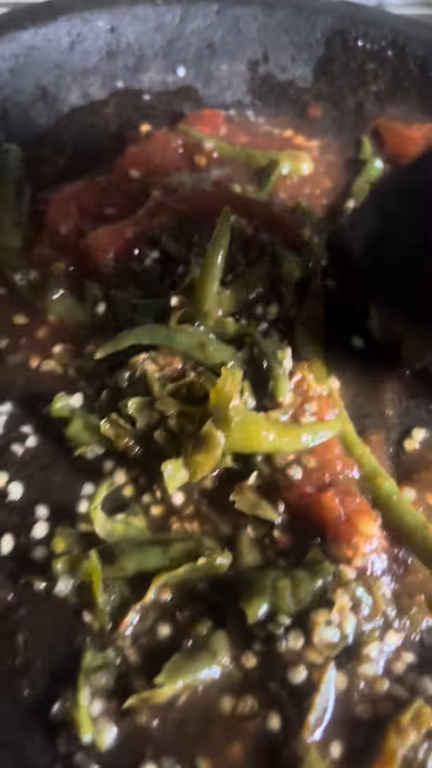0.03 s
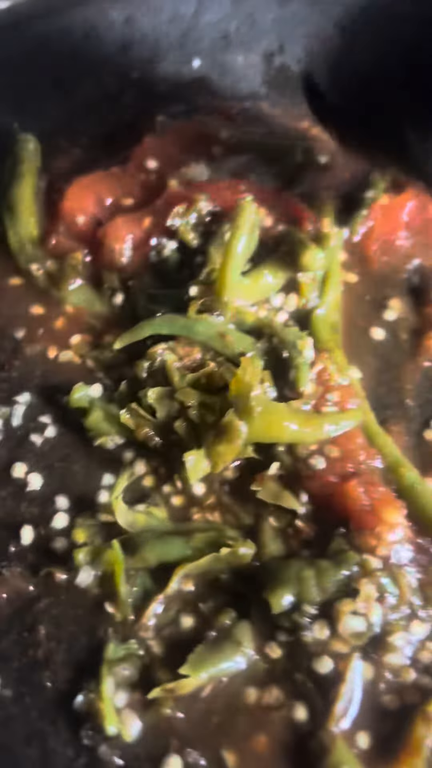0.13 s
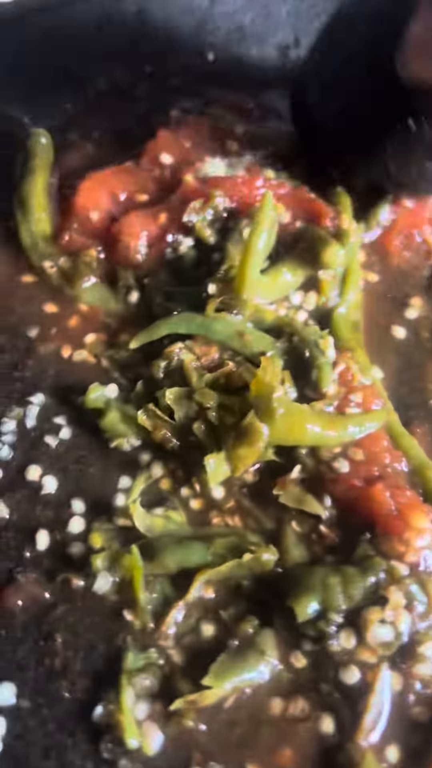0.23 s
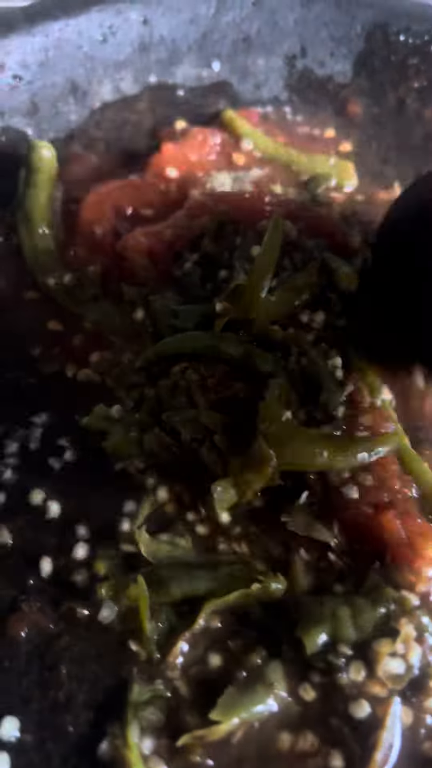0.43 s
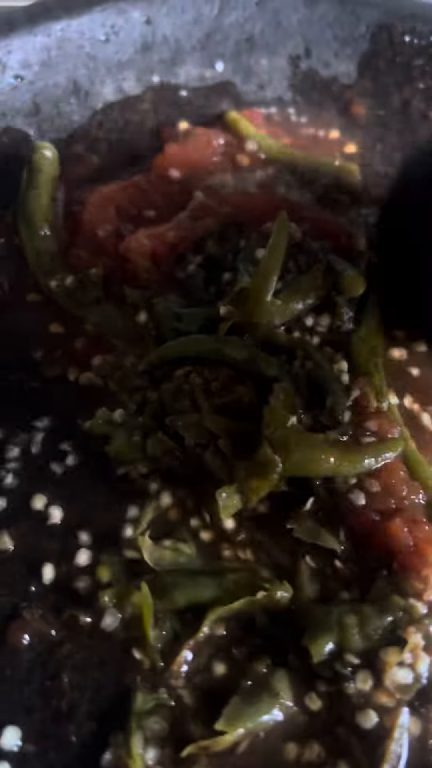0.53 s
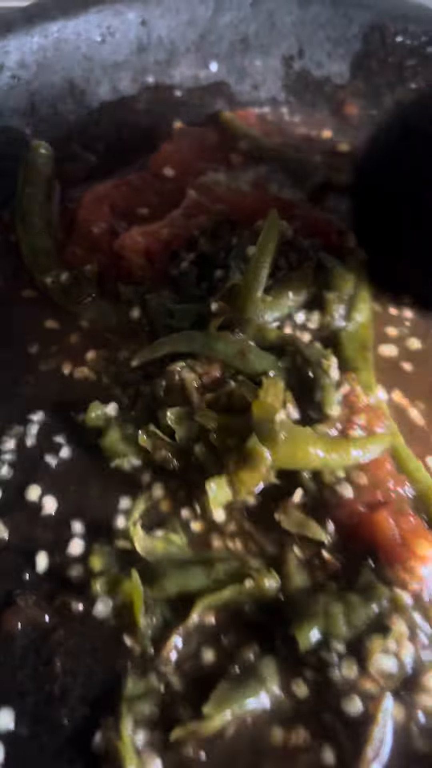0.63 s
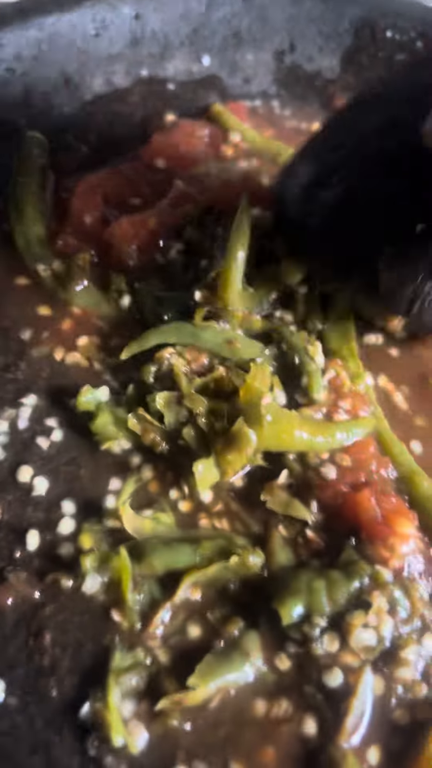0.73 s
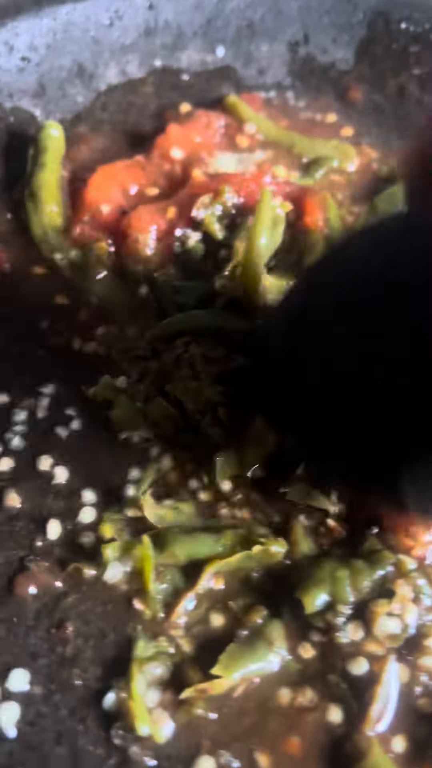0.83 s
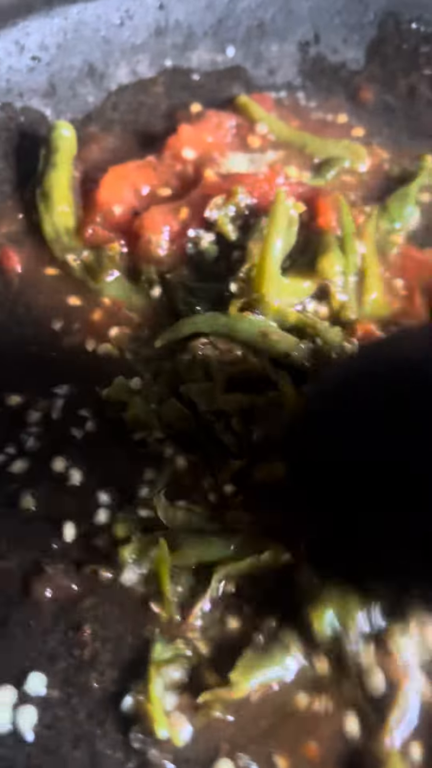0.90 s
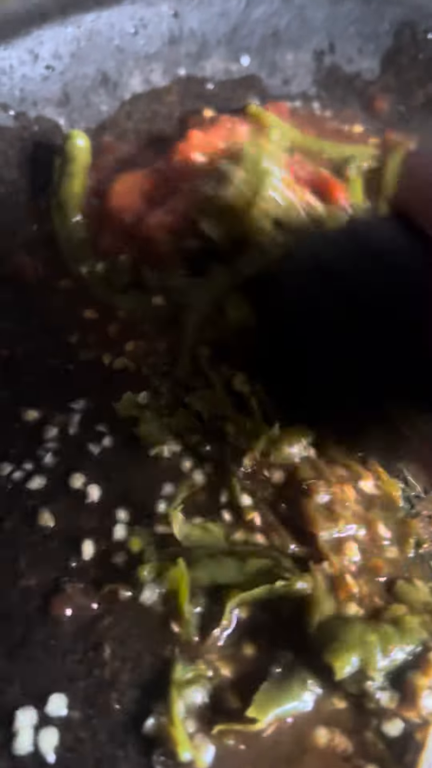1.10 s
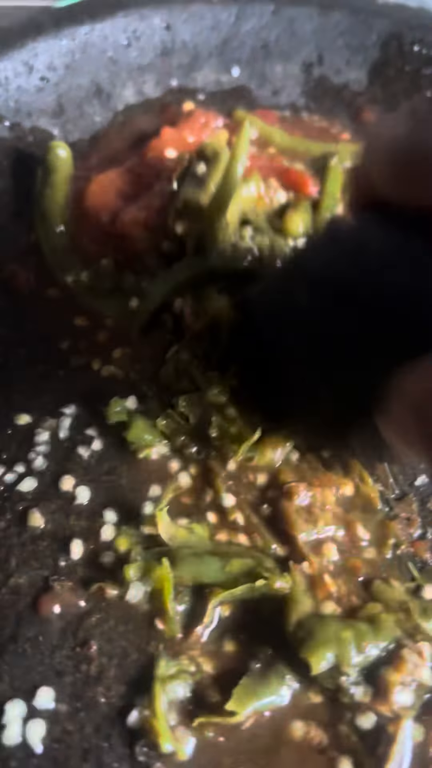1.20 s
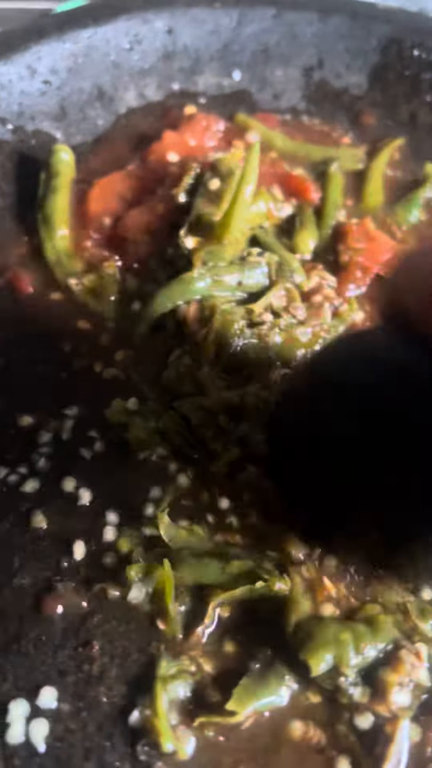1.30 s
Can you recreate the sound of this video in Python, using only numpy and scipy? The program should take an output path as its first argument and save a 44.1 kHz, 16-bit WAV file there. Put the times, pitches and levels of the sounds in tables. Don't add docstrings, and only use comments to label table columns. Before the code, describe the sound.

Close stereo pickup of a mortar and pestle mashing soft vegetables: near quiet, a wet slap and dull thud, a short gritty scrape, fizzing squelches, then a longer, rougher stone grind with knocks.

```python
import sys
import numpy as np
from scipy import signal
from scipy.fft import rfft, irfft, next_fast_len
from scipy.io import wavfile
from scipy.ndimage import uniform_filter1d, map_coordinates

SR = 44100
rng = np.random.default_rng(int(sys.argv[2]) if len(sys.argv) > 2 else 0)


def boost_factor(decibels):
    exponent = np.asarray(decibels, float) / 20
    return 10 ** exponent


def unload_audio(sound):
    columns = np.transpose(np.atleast_2d(sound))
    steps = np.round(np.clip(columns, -1, 1) * 32767)
    wavfile.write(sys.argv[1], SR, steps.astype(np.int16))


N = 59535
T_S = np.arange(N) / SR
WET_UNTIL_S = 0.94

# [f/Hz, width/Hz, level/dB]
LOADED_TABLE = [(52.2, 33, -5.5), (101.1, 13.4, 1), (127.4, 16.7, 2.5), (198, 64.7, -5.5), (240.6, 80, -10)]


def unit(x):
    return x / np.sqrt(np.mean(x ** 2) + 1e-20)


def along(points, hz):
    f, v = np.transpose(points)
    return np.interp(np.log(hz + 1), np.log(f + 1), v)


def curves(rows):
    s, *cols = np.transpose(rows)
    return [np.interp(T_S, s, c) for c in cols]


def wobble(rate_hz):
    knots = rng.standard_normal(int(N * rate_hz / SR) + 4)
    return map_coordinates(knots, [np.arange(N) * rate_hz / SR])


def filtered(x, response):
    m = next_fast_len(N + SR)
    return irfft(rfft(x, m) * response(np.fft.rfftfreq(m, 1 / SR)), m)[..., :N]


def above(f, corner_hz, order):
    return 1 / (1 + (corner_hz / (f + 1)) ** order)


def below(f, corner_hz, order):
    return 1 / (1 + (f / corner_hz) ** order)


def grains(per_s, spread_db):
    chance = rng.random(N)
    size = rng.exponential(size=N)
    sign = np.sign(rng.standard_normal(N))
    thin = rng.standard_normal(N)
    hits = (chance < per_s / SR) * boost_factor(spread_db * np.minimum(size, 3.2)) * sign
    return unit(unit(hits) + 0.87 * thin)


def resonances(peaks):
    def response(f):
        total = 0
        for k, (hz, width_hz, db) in enumerate(peaks):
            damping = 1j * f * width_hz
            total = total + (-1) ** k * boost_factor(db) * damping / (hz * hz - f * f + damping)
        return total
    return response


def grinding():
    # [t/s, scraping level/dB, table load level/dB]
    strokes = [(.25, -74, -29), (.432, -64, -45), (.47, -51.5, -32.5), (.512, -41.5, -41.5),
               (.548, -45.5, -37), (.585, -65, -39), (.69, -66.5, -46.5), (.76, -104, -68),
               (.975, -73, -58), (1.012, -43, -28), (1.12, -43.5, -40), (1.16, -56.5, -35.5),
               (1.195, -39.5, -35), (1.222, -49, -41), (1.24, -33.5, -40), (1.285, -43.5, -34.5),
               (1.31, -61, -37), (1.35, -42.5, -35)]
    # [t/s, extra scraping/dB]
    bites = [(0.437, 15.5), (.45, 14), (0.459, 7.5), (0.495, 5), (.507, 6), (0.519, 7), (0.537, 7.5),
             (0.579, 11), (0.973, 18.5), (1.012, 1.5), (1.036, 6), (1.053, 1), (1.095, -3), (1.237, 3.5),
             (1.248, -1), (1.276, 2.5)]
    # [f/Hz, width/Hz, level/dB]
    scrape_modes = [(303.7, 16, 11), (358, 27, 9.5), (655, 116, -0.5), (927.5, 84, 1.5), (1301, 122, -2),
                    (1660, 230, -2.5), (2330, 170, 1.5), (2844, 155, -4), (4240, 146, -8), (6450, 530, -1),
                    (7000, 200, -14)]
    # [f/Hz, density/dB]
    grit_spectrum = [(150, -33), (300, -5.5), (500, -5), (2000, -13.5), (5000, -19), (8000, -19.5),
                     (11000, -24), (16000, -30)]

    scrape_db, load_db = curves(strokes)
    bite_s = 0.0039
    scrape_db = scrape_db + sum(db * np.exp(-((T_S - s) / bite_s) ** 2) for s, db in bites)
    scrape_db = scrape_db + 0.65 * wobble(58.7) + 2.68 * wobble(250)
    down = T_S > strokes[0][0]
    grit = grains(per_s=5000, spread_db=3) * boost_factor(scrape_db) * down
    ring = resonances([(hz, width_hz * 0.61, db) for hz, width_hz, db in scrape_modes])
    stone = filtered(grit, lambda f: boost_factor(along(grit_spectrum, f)) + boost_factor(0.36) * ring(f) * below(f, 8000, 4))

    wet = T_S < WET_UNTIL_S
    for corner_hz, order, wet_db in [(2100, 6, -6), (16500, 12, -4.5)]:
        bright = filtered(stone, lambda f: above(f, corner_hz, order))
        stone = stone - bright * (1 - boost_factor(wet_db)) * wet

    loaded_from_s = 0.36
    load = rng.standard_normal(N) * boost_factor(load_db + 3.7 * wobble(29.86)) * (T_S > loaded_from_s)
    shaking = filtered(load, lambda f: resonances(LOADED_TABLE)(f) * below(f, 600, 4))
    return boost_factor(11) * stone + boost_factor(23) * shaking


def bubbles():
    # [t/s, peak level/dB, f/Hz]
    pops = [(0.4366, -39, 3900), (0.4575, -34, 4600), (0.4582, -30, 10500), (0.5062, -31, 4550),
            (0.5543, -35.5, 4400), (0.5935, -19.5, 7470), (0.6087, -25, 9450), (0.614, -42, 4900),
            (0.6615, -42, 5100), (0.686, -31, 8700), (0.69, -33, 5450), (0.694, -31.5, 4800),
            (0.7111, -37, 7400), (.724, -50.5, 8900), (0.7426, -32.5, 5770), (0.773, -58, 11000),
            (0.7865, -47, 8350), (0.854, -44, 6370), (0.8674, -38, 6450), (0.873, -38.5, 5500),
            (0.8762, -38.5, 4900), (0.8814, -46, 13500), (0.9943, -34, 6900), (1.0095, -23.5, 4100),
            (1.0306, -32, 4100), (1.0372, -28.5, 4120), (1.05, -15.5, 6740), (1.054, -21, 6900),
            (1.0684, -34, 6300), (1.1352, -25, 6460), (1.1348, -30, 14300), (1.1428, -27, 10500),
            (1.155, -32, 13700), (1.169, -22, 7100), (1.1844, -44, 3640), (1.198, -39, 14000),
            (1.2045, -16, 7000), (1.3179, -28, 6440), (1.317, -35, 14300), (1.3289, -26, 6060),
            (1.3455, -33, 4070), (1.346, -29, 11600)]
    # [t/s, peak level/dB, f/Hz]
    knocks = [
        (.4486, -30, 914),
        (.4492, -45, 560),
        (0.8681, -35.5, 2150),
        (.9905, -33, 603),
        (1.2475, -18, 2330),
        (1.2764, -24, 4070),
    ]
    pop_cycles, pop_db = 3.5, -5
    spit_db, spit_t60_s = 1, 0.0048

    out = np.zeros(N + SR)
    t = np.arange(900) / SR
    for s, db, hz in list(pops) + list(knocks):
        bubble = np.sin(2 * np.pi * hz * t) * np.exp(-t * hz / pop_cycles)
        crack = uniform_filter1d(rng.standard_normal(len(t)), size=5)
        spit = boost_factor(spit_db - 60 * t / spit_t60_s) * crack * np.sin(2.4 * np.pi * hz * t) * (hz > 3000)
        onset = 1 - np.exp(-t * hz / 0.63)
        out[round(s * SR):][:len(t)] += boost_factor(db + pop_db) * (bubble + spit) * onset
    return out[:N]


def pulp():
    # [t/s, level/dB]
    squeeze = [(0, -76), (.04, -86.5), (.2, -80), (.225, -58.5), (.31, -63.5), (.37, -59), (.62, -63),
               (.655, -53.5), (.688, -50), (.70, -68.5), (.84, -82.5), (.875, -60.5), (.96, -76.5),
               (1.045, -47.5), (1.11, -51), (1.16, -60.5), (1.26, -49.5), (1.31, -102)]
    # [f/Hz, density/dB]
    fizz_spectrum = [(530, -47.5), (900, -9), (3150, -7.5), (4100, -7), (8550, -6.5), (10400, -20),
                     (14700, -45), (16000, -28)]
    # [f/Hz, width/Hz, level/dB]
    pocket_modes = [(4670, 950, -0.47), (5490, 1200, -0.43)]
    fizz_per_s, fizz_spread_db = 11000, 3

    squeeze_db, = curves(squeeze)
    fizz = filtered(grains(fizz_per_s, fizz_spread_db), lambda f: boost_factor(along(fizz_spectrum, f)))
    fizz = unit(fizz) * boost_factor(squeeze_db + 1.73 * wobble(49.4))

    hardest_db = squeeze_db.max()
    spray_db = hardest_db + 2.5 + 2.86 * (squeeze_db - hardest_db)
    spray = filtered(grains(fizz_per_s, fizz_spread_db), lambda f: above(f, 10500, 8))
    spray = unit(spray) * boost_factor(spray_db + 1.5 * wobble(64))

    pockets_db = -49.5 - 1.5 + 1.8 * (squeeze_db + 52.5) + 4.1 * wobble(92.1)
    pockets = unit(filtered(grains(2500, 4), resonances(pocket_modes)))
    pockets = pockets * (T_S < WET_UNTIL_S) * boost_factor(pockets_db)
    return fizz + spray + pockets + bubbles()


def slap():
    # [f/Hz, density/dB]
    slap_spectrum = [(530, -52), (900, -15.5), (3070, -13), (4200, -3.5), (6890, -7), (8050, 3),
                     (9530, -13.5), (12600, -7.5), (16000, -23)]
    slap_s, hold_s = 0.2073, 0.0008
    crack_db, crack_t60_s = -20.5, 0.0017
    splash_db, splash_t60_s = -28.5, 0.04

    t = T_S - slap_s
    u = np.clip(t - hold_s, 0, None)
    decay = boost_factor(crack_db - 60 * u / crack_t60_s) + boost_factor(splash_db - 60 * u / splash_t60_s)
    first_touch = (t > -0.0022) * (t < 0) * boost_factor(-44)
    noise = filtered(rng.standard_normal(N), lambda f: boost_factor(along(slap_spectrum, f)))
    return unit(noise) * ((t > 0) * decay + first_touch)


def thumps():
    # [t/s, level/dB, softness corner f/Hz]
    blow_rows = [
        (0.214, -8.5, 1800),
        (0.4381, -26.5, 790),
        (1.0043, -30.5, 440),
        (1.0177, -39.5, 424),
        (1.1871, -29, 374),
        (1.2715, -37, 368),
    ]
    # [f/Hz, level/dB, t60/s]
    table_modes = [(63.9, -8, .25), (118.4, .5, .21), (169.8, 5.5, .042), (189.2, -15, .4), (280, -24, .15),
                   (373.6, -10.5, .049), (403.5, -29, .3), (441, -24, .017), (542, -13, .044),
                   (1340, -13, .028)]

    ring = resonances([(hz, 1.82 / t60_s, db + 20 * np.log10(t60_s)) for hz, db, t60_s in table_modes])

    def path(f):
        push = boost_factor(-36.2) * 1j * (f / 2000) / (1 + 1j * f / 2000) ** 2
        cushion = (1 + 1j * f / 4000) / (1 + 1j * f / 666)
        hollow = 1 - 0.5 * np.exp(-((f - 286) / 40) ** 2)
        bend_s = 0.0065
        bend = np.exp(-4j * np.pi * bend_s * np.sqrt(100 * f))
        blows = sum(boost_factor(db) * np.exp(-2j * np.pi * f * s) * below(f, hz, 4) for s, db, hz in blow_rows)
        return (ring(f) + push) * cushion * hollow * below(f, 1420, 16) * bend * blows

    return 3000 * filtered(np.arange(N) == 0, path)


def judders():
    # [start t/s, length/s, peak level/dB, f/Hz]
    judder_rows = [(.0, 0.057, -36.5, 58.3), (0.332, 0.049, -31.5, 56.6), (.445, 0.047, -34, 116),
                   (0.501, 0.079, -29, 98), (1.0, 0.059, -22.5, 121.5), (0.997, .035, -33.5, 332.4),
                   (1.029, 0.026, -37, 355), (1.05, 0.073, -34.5, 115), (1.055, 0.075, -38, 300.6),
                   (1.08, 0.062, -33, 62.2), (1.18, 0.043, -31, 121.5), (1.257, 0.046, -32.5, 126.3),
                   (1.258, 0.044, -39.5, 298.7), (1.284, 0.087, -35, 53.3)]
    wander_rad = 0.97 * wobble(40.03)
    out = np.zeros(N)
    for s, long_s, db, hz in judder_rows:
        swell = np.sin(np.pi * np.clip((T_S - s) / long_s, 0, 1))
        out += boost_factor(db) * swell * np.sin(2 * np.pi * hz * (T_S - s) + wander_rad)
    return out


def rattle():
    # [f/Hz, width/Hz, level/dB]
    rattle_modes = [(247, 57, -0.2), (396, 160, -8), (537, 89, -8)]
    t = T_S - 0.2235
    dull = lambda f: resonances(rattle_modes)(f) * below(f, 750, 6) * above(f, 190, 6)
    decay = boost_factor(-29.5 - 60 * abs(t) / 0.28)
    return unit(filtered(rng.standard_normal(N), dull)) * decay * np.clip(t / 0.0025, 0, 1)


def return_slide():
    # [f/Hz, width/Hz, level/dB]
    slide_modes = [(1770, 320, 4), (3220, 1200, -1.5)]
    centre_s, long_s = 0.963, 0.077
    thin = lambda f: resonances(slide_modes)(f) * above(f, 1300, 6) * below(f, 4500, 6)
    swell = np.exp(-((T_S - centre_s) / long_s) ** 4)
    return unit(filtered(grains(3700, 2.6), thin)) * boost_factor(-63.5) * swell


def kitchen():
    # [f/Hz, rms level/dB]
    hum_lines = [(49.6, -45.5), (99.2, -70), (148.5, -74.5), (246, -77.5), (296, -80.5)]
    # [f/Hz, density/dB]
    air_spectrum = [(30, -27), (55, -6), (140, -20), (400, -47), (800, -52.5), (2000, -36), (3600, -62.5),
                    (8500, -67.5), (16000, -62)]
    air_db = -57

    hum = np.zeros(N)
    for hz, db in hum_lines:
        level = np.sqrt(2) * boost_factor(db + 0.74 * wobble(24))
        hum += level * np.sin(2 * np.pi * (hz * T_S + rng.random()))

    ringing = lambda f: resonances(LOADED_TABLE)(f) * below(f, 500, 4)
    fading = unit(filtered(rng.standard_normal(N), ringing)) * boost_factor(-39.5 - 60 * T_S / 0.4)

    air = filtered(rng.standard_normal((2, N)), lambda f: boost_factor(along(air_spectrum, f)))
    apart = filtered(air[1], lambda f: above(f, 250, 4) * below(f, 1100, 4) + 0.36 * (f > 3500))
    common = hum + fading + boost_factor(air_db) * unit(air[0])
    return common, boost_factor(air_db + 6.5) * apart / np.std(air[1])


def walls(x):
    # [f/Hz, t60/s]
    room_t60 = [(200, 0.43), (2000, 0.34), (10000, 0.2)]
    hz, t, z = signal.stft(rng.standard_normal((2, SR // 3)), SR, nperseg=256)
    decay = boost_factor(-60 * t / along(room_t60, hz)[:, None])
    tail = signal.istft(z * decay, SR, nperseg=256)[1]
    tail = tail / np.linalg.norm(tail[0])
    delayed = np.pad(x, (200, 0))[None]
    return signal.fftconvolve(delayed, tail, axes=1)[:, :N]


def scene():
    # [f/Hz, left-right/dB]
    lean = [(60, 1.1), (110, 1.1), (200, 3.5), (320, 4), (500, 7.5), (850, -7), (1500, 2), (15000, 0.5)]
    # [f/Hz, left-right/rad]
    lead = [(200, .03), (350, -.2), (650, -.85), (900, -.5), (1100, .02), (4300, .1), (4900, -1.15),
            (15000, -1.55)]
    near = grinding() + pulp() + slap() + thumps() + judders() + rattle() + return_slide()
    still, apart = kitchen()
    half = lambda f: boost_factor(along(lean, f) / 2) * np.exp(0.5j * along(lead, f))
    ports = filtered(near + still, lambda f: np.array([half(f), 1 / half(f)]))
    wet = filtered(walls(near), lambda f: f / (f + 600))
    return ports + boost_factor(-15) * wet + apart * [[1], [-1]]


def low_pass(x):
    return signal.sosfilt(signal.butter(12, 16680, fs=SR, output="sos"), x)


def record(dry):
    def case(f):
        notch = 1 - 0.6 * np.exp(-((f - 5050) / 330) ** 2)
        return notch * below(f, 15750, 80) * above(f, 28, 4)
    return low_pass(filtered(dry, case))


dry = scene()
out = record(dry)
unload_audio(out)
```